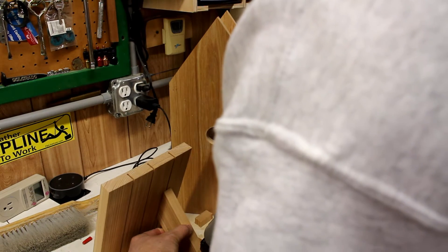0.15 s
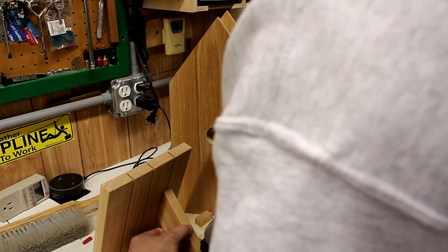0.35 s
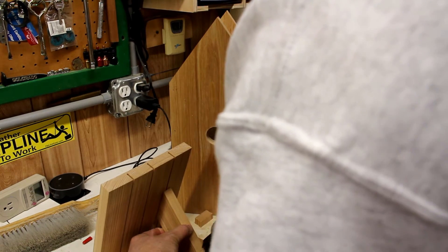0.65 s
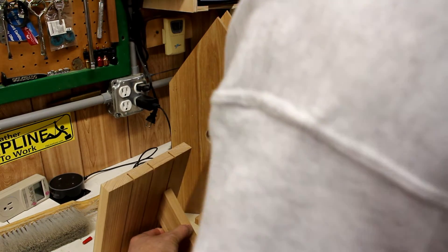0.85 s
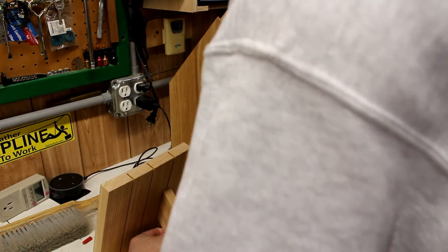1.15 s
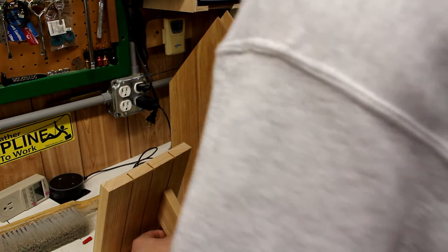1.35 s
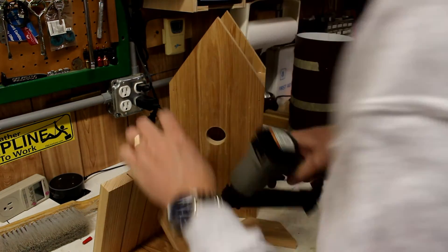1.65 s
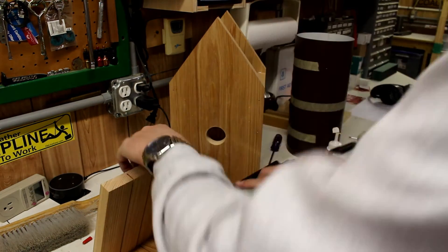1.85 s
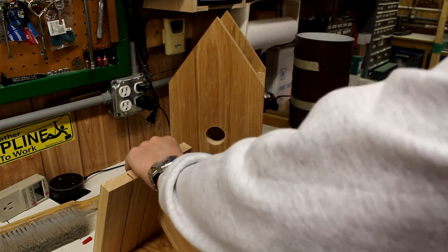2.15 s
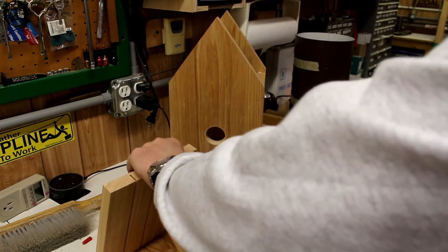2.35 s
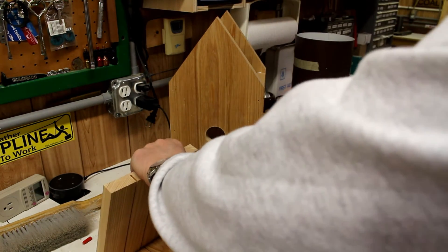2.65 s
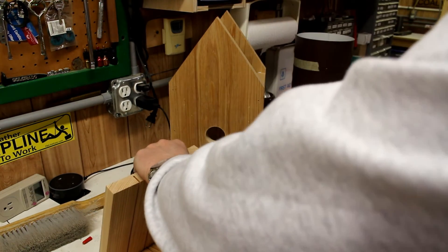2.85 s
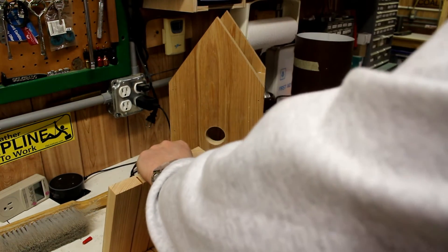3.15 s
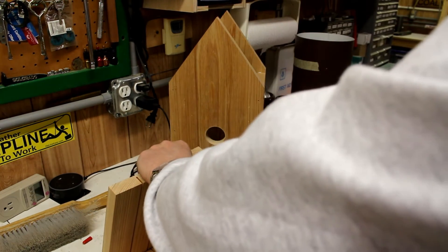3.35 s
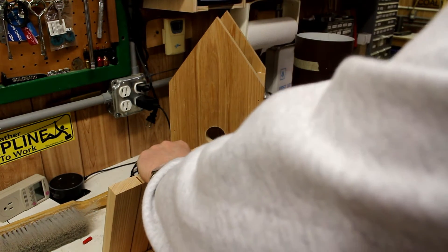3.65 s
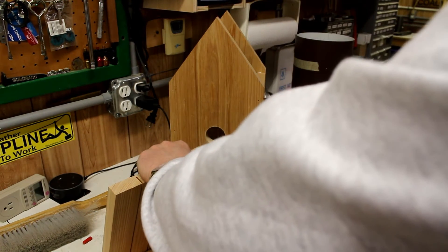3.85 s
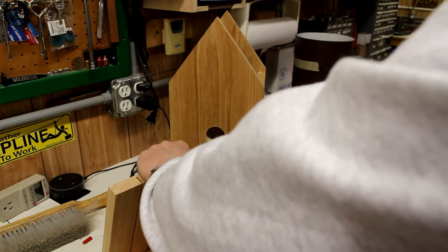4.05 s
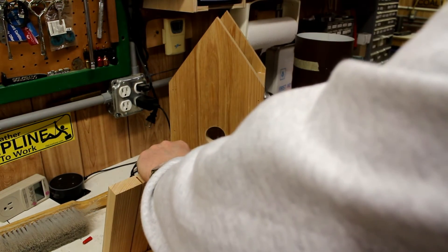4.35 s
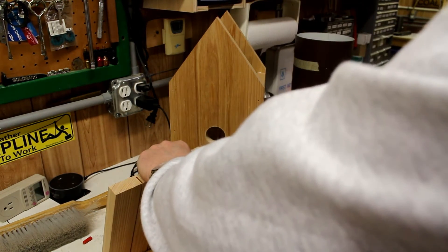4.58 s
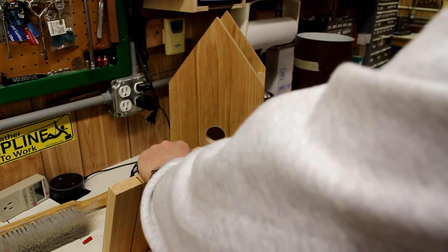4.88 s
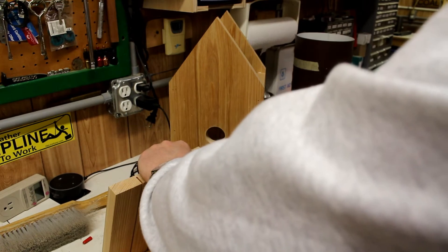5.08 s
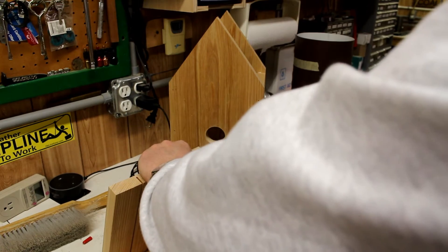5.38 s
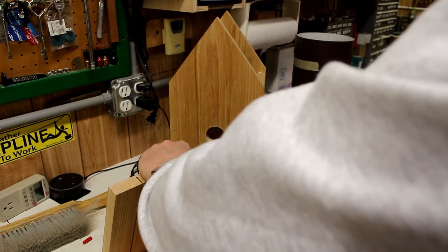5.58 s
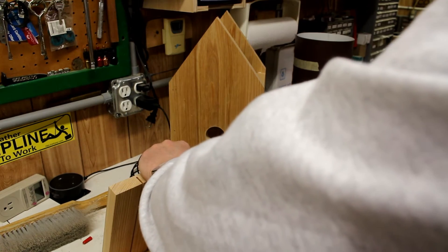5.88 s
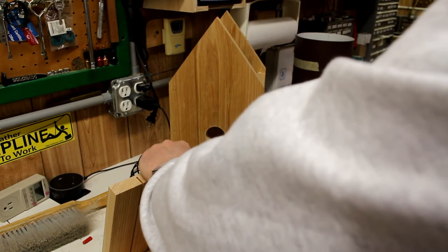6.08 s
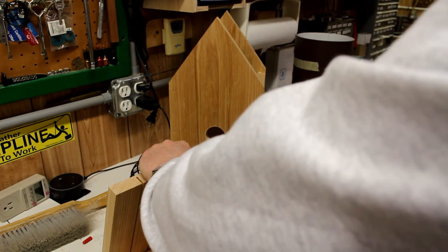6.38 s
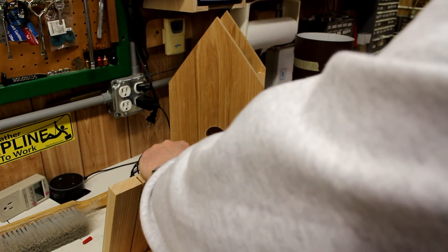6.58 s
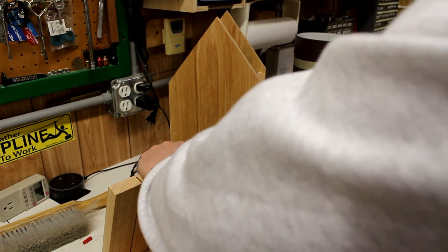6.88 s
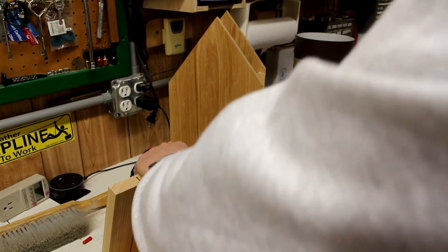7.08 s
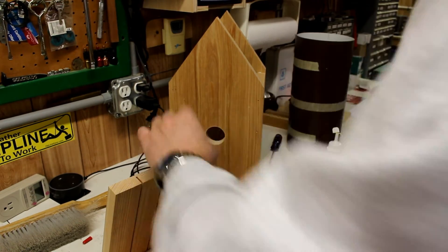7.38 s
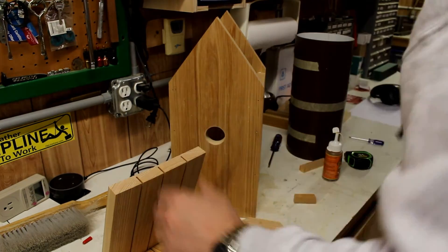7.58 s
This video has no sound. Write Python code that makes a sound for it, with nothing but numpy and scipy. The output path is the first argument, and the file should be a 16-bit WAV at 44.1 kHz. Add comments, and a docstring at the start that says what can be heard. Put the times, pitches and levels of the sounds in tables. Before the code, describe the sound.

Close stereo microphones in a small workshop. A faint board tap, then an air nailer slams with a hard crack, a rebound knock and a short burst of vented air. Steel clicks follow, then quiet handling: a bench thump, brief scrapes, hollow wood knocks and sleeve rustle. Metal clicks and squeaks gather before a second bang and puff, then a clink and soft nudges over low hum.

```python
"""Air nailer at the workbench

An air nailer drives two brads into a wooden birdhouse in a small workshop: bursts of noise and a pressure pulse.
Between and around the shots, boards tap, tick, knock and scrape (short noises and ringing tones, rubbing noise);
the nailer rebounds after each shot with a knock, and its sprung steel nose clicks (high ringing tones).
The bench thumps at low pitches and sleeves swish. Room tone and a low hum lie under it all.
A limiter ducks each shot and lets the room swell back."""
import sys
import numpy as np
from scipy import signal
from scipy.fft import rfft, irfft, next_fast_len
from scipy.io import wavfile
from scipy.ndimage import uniform_filter1d

SR = 44100
rng = np.random.default_rng(int(sys.argv[2]) if len(sys.argv) > 2 else 0)


def master_out(mix):
    """Clip the mix to full scale and print it as 16-bit PCM to the path in sys.argv[1]."""
    frames = np.transpose(np.atleast_2d(mix))
    ceiling = np.clip(frames, -1, 1)
    pcm = np.round(ceiling * 32767).astype(np.int16)
    wavfile.write(sys.argv[1], SR, pcm)


N = 340893
TIME = np.arange(N) / SR
HIT = np.arange(SR * 3 // 5) / SR  # the time axis of one blow

# In all tables t60 is the time to die away by 60 dB. Event levels are relative: some layers are trimmed later.
# One row a shot: (valve opens [s], valve level [dB], housing ring [dB], driver lands [s], driver level [dB],
# noise tail up to the exhaust [dB], exhaust starts [s], puff level [dB], puff t60 [s],
# trailing air [dB], its t60 [s])
SHOTS = [(.492, 11, -8.5, .5117, 17, -10, .6175, 4.5, 0.14, -11.5, 0.3),
         (6.6379, 7.5, -2, 6.6575, 15.5, -13, 6.753, 1.5, 0.13, -7, 0.34)]
# Colour of the air spitting through the valve: (frequency [Hz], level [dB])
VALVE_COLOUR = [(40, -9), (250, 1), (700, -11.5), (1500, -14), (2500, -3), (3550, -3), (4400, -6),
                (5350, 6), (6800, -11), (8800, 2), (11000, -9), (16000, -0.5)]
# Colour of the driver's slam: (frequency [Hz], level [dB])
DRIVER_COLOUR = [(40, -17), (170, -11), (400, -3.5), (850, -6.5), (1350, -2), (1700, 4), (2200, 1),
                 (3600, -2.5), (7000, -10.5), (16000, -16.5)]
# Ringing tones of the nailer's housing: (frequency [Hz], level [dB], t60 [s])
HOUSING_MODES = [(1200, -10.5, 0.075), (2430, -4.5, 0.0491), (3046, -11, .04), (3526, 1.5, 0.055),
                 (5400, -1.5, 0.043)]
# Colour of the steady noise tail between slam and exhaust, the room's ring: (frequency [Hz], level [dB])
TAIL_COLOUR = [(100, -3.5), (900, -3.5), (2000, 1), (5200, 1), (7000, -6), (10000, -10), (16000, -6.5)]
# Colour of the venting cylinder: (frequency [Hz], level [dB])
EXHAUST_COLOUR = [(40, -4.5), (300, -6), (1000, -10.5), (2000, -13.5), (3500, -3), (5800, 2), (8000, -3),
                  (11000, -6), (16000, -3)]

# The steel nose snaps, slides or catches:
# (time [s], click [dB], ring [dB], squeak [dB], wood under it [dB], contact t60 [s])
CLICKS = [(.766, -25, -33, -43, -37.5, 0.11), (1.621, -23, -17, -40, -62, 0.04),
          (1.634, -23.5, -27, -36, -67, 0.097), (3.553, -27, -25, -29, -49, 0.075),
          (3.722, -35, -39, -62, -54, 0.0083), (5.109, -35.5, -60, -53, -41.5, 0.022),
          (5.331, -26.5, -61, -33, -38, 0.017), (5.534, -27.5, -31, -17.5, -48, 0.067),
          (5.5809, -24, -45, -29, -45.5, 0.018), (5.831, -31, -43, -29, -39.5, 0.074),
          (5.974, -36.5, -55, -55, -43.5, 0.028), (6.155, -31.5, -59, -45, -52, 0.03),
          (6.248, -28.5, -51, -35, -33, 0.027), (6.386, -26.5, -45, -28.5, -43, 0.066),
          (6.409, -33.5, -54, -46, -43.5, 0.018), (6.4772, -25, -43, -37, -30, 0.021),
          (6.927, -16, -24, -38, -37.5, 0.036), (6.935, -21, -56, -41, -50, 0.016),
          (7.313, -30, -28, -45, -70, 0.18)]
# Ringing tones of the steel nose: (frequency [Hz], level [dB], t60 [s])
STEEL_MODES = [(2640, -13, 0.056), (3200, -13.5, .025), (6153, -1, 0.025), (6250, -2.5, 0.053),
               (8160, -19, .045), (9160, -13, 0.063), (9600, -18, 0.095), (12200, -10, 0.035),
               (15590, -12, 0.033)]
# Highest tones, heard as the steel slides: (frequency [Hz], level [dB], t60 [s])
SQUEAK_MODES = [(10000, -17.5, 0.049), (14000, -4, .024), (14300, -8, 0.016), (15650, -7, .02)]
# Ringing tones of the nailer's spring: (frequency [Hz], level [dB], t60 [s])
SPRING_MODES = [(1630, -0.5, 0.049), (2280, -4, .09), (5260, 2, 0.03), (6660, 1, .05), (8350, -1.5, 0.054)]
NOSE_WOOD_HZ = 440  # pitch of the board where the nose touches it
RESEAT_S, RESEAT_DB = 6.934, -21  # the nailer rocks back against the wood and its housing rings
RELEASE_S, RELEASE_DB = 7.3138, -30.5  # the nailer is lifted off and its spring clinks
SKID_RAD = 0.38  # how far the chattering contact jolts each tone's phase

# Knocks on wood: boards tapping, and the nailer rebounding after each shot:
# (time [s], clack [dB], board ring [dB], bright edge [dB], clack t60 [s])
KNOCKS = [(0.08, -38, -46.5, -35.5, 0.033), (0.3653, -24, -34, -27.5, 0.034),
          (0.6443, -18, -33, -10, 0.037), (0.6665, -14, -34, -28, 0.027), (2.1288, -28, -24, -58, 0.048),
          (2.6343, -31.5, -36, -67, 0.026), (2.915, -33, -35.5, -58, 0.08), (2.9377, -36, -41, -37.5, .04),
          (2.9663, -24.5, -42.5, -48, 0.02), (3.0211, -31, -44, -52, 0.013),
          (3.1453, -24.5, -39, -50, 0.013), (3.1959, -29, -36.5, -48, 0.026),
          (3.2278, -28.5, -47, -55, .04), (3.3974, -37, -42.5, -37.5, 0.033),
          (3.4498, -21, -31.5, -43, 0.025), (3.8693, -35.5, -47, -62, 0.032), (4.899, -25, -30, -30, 0.04),
          (4.9783, -24.5, -47, -51, 0.032), (6.78, -4, -21, -7, 0.03), (6.802, -3, -27, -20, .04)]
# Ringing tones of the boards: (frequency [Hz], level [dB], t60 [s])
BOARD_MODES = [(184, -5.5, .12), (251, -1, 0.083), (345, -0.5, 0.081), (400.7, -2, 0.13), (478, -2, 0.082),
               (590, -2.5, 0.085), (720, -4, 0.05), (870, -8, 0.074)]
# Colour of the dry clack: (frequency [Hz], level [dB])
CLACK_COLOUR = [(200, -14), (700, -10), (1100, -3), (1800, 2), (2400, -3), (3100, 1), (5000, -7.5),
                (7500, -17), (16000, -39)]
# Colour of the knock's bright edge: (frequency [Hz], level [dB])
EDGE_COLOUR = [(1000, -33.5), (4500, -9), (7800, 5.5), (10500, -4), (13000, -1.5), (16000, -2.5)]
# An edge catches in the grain and lets go with a dry tick: (time [s], level [dB], pitch [Hz])
TICKS = [(2.987, -40, 4800), (3.0884, -38, 3800), (3.438, -34.5, 4070), (4.05, -51.5, 2800),
         (4.119, -51.5, 4150), (4.574, -47.5, 1490), (4.646, -50.5, 2120), (4.888, -42, 2470),
         (5.444, -39.5, 2580), (6.123, -43, 2760), (6.157, -33.5, 2980), (6.411, -31.5, 2890)]
TICK_T60_S, TICK_RING_S = 0.06, 0.097  # t60 of a tick's snap and of its ring
# A board is nudged against its neighbour and gives a hollow knock: (time [s], level [dB], pitch [Hz])
NUDGES = [(2.918, -34.5, 391), (3.131, -36.5, 387), (3.564, -36, 428), (3.608, -37.5, 380),
          (3.869, -44, 470), (3.959, -46.5, 400), (4.208, -41, 397), (4.978, -29.5, 412),
          (7.628, -40.5, 440), (7.65, -40.5, 426)]
BEND, BEND_S = 0.18, 0.015  # pressed wood starts sharp by this fraction; time constant of its relaxing

# The bench takes a push: (time [s], level [dB], pitch [Hz], builds in [s])
THUMPS = [(2.13, -16.5, 178.2, 0.004), (2.134, -23.5, 86.5, 0.0097), (2.636, -31, 190, 0.0042),
          (3.19, -34.5, 125, 0.011), (3.462, -35.5, 125, 0.01), (3.722, -28, 83.4, 0.02),
          (3.876, -33, 77.6, 0.011), (4.897, -33.5, 188, 0.0029), (5.121, -20, 113.8, 0.022),
          (5.433, -32, 61, 0.014), (5.861, -28.5, 55, 0.015), (6.93, -35.5, 114, .009),
          (7.19, -38, 40, 0.016), (7.645, -34, 32.3, .03)]
# The sway's t60 at this pitch; lower sways last longer by this power
SWAY_T60_S, SWAY_HZ, SWAY_SLOPE = 0.21, 100, 0.84
# A board slides over the bench:
# (start [s], level [dB], breaks loose in [s], pushed for [s], t60 as it comes to rest [s])
SCRAPES = [(2.284, -35.5, 0.0035, 0.012, 0.12), (2.304, -36.5, 0.0089, .008, 0.71),
           (2.834, -43, 0.062, 0.033, 0.098), (2.935, -42, .007, 0.062, 0.67),
           (3.074, -40, 0.016, 0.053, 0.08), (3.189, -35.5, 0.0033, .008, 0.065)]
# Colour of rubbing wood grain: (frequency [Hz], level [dB])
GRAIN_COLOUR = [(120, -26), (220, 1.5), (461, -2), (815, -6), (1100, -2), (2400, -4.5), (3000, -4),
                (3250, -10), (3520, -2), (4150, -12), (4730, -9), (5100, -16), (5700, -16), (8210, -25.5),
                (14000, -42)]
# Colour of boards shifting under the hands: (frequency [Hz], level [dB])
JOSTLE_COLOUR = [(30, -3.5), (110, 7.5), (170, -8), (240, -5), (330, -12), (460, -7), (800, -17.5),
                 (2000, -38.5), (6000, -50)]
HOLD_S, HOLD_FOR_S, HOLD_DB = 1.51, 5.48, -52.5  # hands hold the boards: start, duration, steady jostle
# The boards rock after each contact: level relative to its wood level in the tables, rise and t60
ROCK_DB, ROCK_RISE_S, ROCK_T60_S = -14, 0.0294, 0.61
# The sleeve brushes past as the arm moves: (middle [s], length [s], level [dB])
SWISHES = [(1.695, 0.43, -48), (2.164, 0.31, -48.5), (4.899, 0.051, -41.5), (5.57, 0.44, -52.5),
           (6.45, 0.14, -45.5), (7.23, 0.67, -52), (7.71, 0.17, -45)]
# Colour of the brushing sleeve: (frequency [Hz], level [dB])
CLOTH_COLOUR = [(300, 8.5), (900, 5.5), (2500, 4.5), (4000, 0), (5000, 3), (6500, -6.5), (9000, -5),
                (12000, -17), (16000, -16.5)]
# Colour of the sleeve on the long reach: (frequency [Hz], level [dB])
REACH_COLOUR = [(1000, -7), (4200, -4), (5000, 2), (7000, -5), (9500, -8.5), (16000, -22)]
REACH_S, REACH_FOR_S, REACH_DB = 1.916, 0.36, -52.5  # an arm reaches across the bench: start, duration, level

# Colour of the room tone: (frequency [Hz], level [dB])
AIR_COLOUR = [(25, -27.5), (50, -18), (85, -15), (125, -21), (220, -26), (730, -29.5), (1050, -31),
              (2000, -35), (2700, -37), (5000, -39.5), (10000, -48.5)]
AIR_DB = -54.5
# Mains hum: (frequency [Hz], level [dB])
HUM = [(60, -51), (120, -65)]
# How long the room rings: (frequency [Hz], t60 [s])
ROOM_DECAY = [(100, 0.4), (500, 0.6), (2000, 0.53), (5000, 0.57), (9000, 0.35), (16000, 0.19)]
# Left-right difference relative to the middle: (frequency [Hz], level [dB])
WIDTH = [(40, -30), (250, -21), (600, -16.5), (1200, -25), (2500, -23), (5000, -19), (14000, -16)]
# Colour of each microphone's own noise: (frequency [Hz], level [dB])
HISS_COLOUR = [(100, 1.5), (1000, 0.5), (16000, 0.5)]
HISS_DB = -55.5
BAND_END_HZ = 16050


def amp(db):
    """Decibels to gain."""
    return 10 ** (np.asarray(db) / 20)


def unit(x):
    """Scales to rms 1."""
    return x / np.sqrt(np.mean(x ** 2) + 1e-20)


def crest(x):
    """Scales so that the loudest 4 milliseconds have rms 1."""
    return x / np.sqrt(uniform_filter1d(x ** 2, size=176).max() + 1e-20)


def read(points, hz):
    """Reads a table at any frequency, on a logarithmic frequency axis."""
    f, value = np.transpose(points)
    return np.interp(np.log(hz + 1), np.log(f + 1), value)


def add(mix, s, sound):
    """Lays a sound into the mix at time s."""
    part = mix[round(s * SR):][:len(sound)]
    part += sound[:len(part)]


def noise(spectrum, size=N, ripple_db=0):
    """Noise of rms 1 with the given colour, and optional chance peaks a few hundred Hz apart."""
    count = next_fast_len(size)
    hz = np.fft.rfftfreq(count, 1 / SR)
    ripple = np.interp(hz, np.linspace(0, SR / 2, 80), rng.standard_normal(80))
    colour = amp(read(spectrum, hz) + ripple_db * ripple)
    return unit(irfft(rfft(rng.standard_normal(count)) * colour, count)[:size])


def drift(rate):
    """A random wander of rms 1, heading for a new value rate times a second."""
    return unit(np.interp(TIME * rate, np.arange(N // 8), rng.standard_normal(N // 8)))


def swell(rise, t60):
    """A smooth, quick rise and an exponential fall."""
    attack = np.sin(np.pi / 2 * np.minimum(HIT / rise, 1)) ** 2
    return attack * amp(-60 * np.maximum(HIT - rise, 0) / t60)


def gesture(start, rise, hold, t60):
    """The gain of one movement: it builds, holds and dies away."""
    t = TIME - start
    return np.clip(t / rise, 0, 1) * amp(-60 * np.maximum(t - rise - hold, 0) / t60)


def burst(spectrum, rise, t60):
    """A puff of noise that rises quickly and dies away."""
    return crest(noise(spectrum, len(HIT)) * swell(rise, t60))


def knock(spectrum, rise, t60):
    """Noise standing for a crowd of heavily damped tones; each contact favours different ones."""
    return crest(noise(spectrum, len(HIT), ripple_db=3) * swell(rise, t60))


def ring(modes, contact_t60):
    """Tones driven by a chattering contact: each builds and skids, then dies at its own speed."""
    out = np.zeros(len(HIT))
    for hz, db, t60 in modes:
        shape = swell(contact_t60 / 10, t60)
        jolts = SKID_RAD * np.interp(HIT * hz / 12, np.arange(1000), rng.standard_normal(1000))
        skid = jolts * swell(0.001, 6 * contact_t60)
        turns = (hz + 14 * rng.standard_normal()) * HIT + rng.random()  # the grip shifts each tone
        level = amp(db + 1.7 * rng.standard_normal())
        out += level * shape * np.sin(2 * np.pi * turns + skid)
    chatter = 1 + 0.61 * rng.standard_normal(len(HIT)) * swell(0.001, contact_t60)
    return crest(out * uniform_filter1d(chatter, size=16))


def relaxing(hz):
    """A tone that starts a little sharp and sinks to its pitch."""
    return np.sin(2 * np.pi * np.cumsum(hz * (1 + BEND * np.exp(-HIT / BEND_S))) / SR)


def hollow(hz):
    """A board's main bending tone speaks first; a lower one blooms after it, over the ring of the rest."""
    upper = relaxing(hz) * swell(0.0059, 0.048)
    lower = amp(-12) * relaxing(hz * 0.554) * swell(0.019, 0.1)
    return crest(crest(upper + lower) + amp(-2) * ring(BOARD_MODES, contact_t60=0.09))


def grains(per_s, spread_db, colour, t60):
    """Scattered micro-contacts of uneven size, each one of eight kinds of tiny noisy click."""
    sizes = amp(spread_db * np.minimum(rng.exponential(1, N), 3))
    train = (rng.random(N) < per_s / SR) * sizes
    kind = rng.integers(0, 8, N)
    out = np.zeros(N)
    for k in range(8):
        click = burst(colour, rise=0.00023, t60=t60)[:SR // 20]
        out += signal.oaconvolve(train * (kind == k), click)[:N]
    return unit(out)


def shots():
    """The valve spits, the driver slams, a noise tail rings on; letting the trigger go vents the cylinder."""
    out = np.zeros(N)
    for (valve_s, valve_db, housing_db, driver_s, driver_db, tail_db,
         vent_s, puff_db, puff_t60, trail_db, trail_t60) in SHOTS:
        # air rushes in while the piston travels, and stops soon after it lands
        stroke = np.clip(1 - (HIT - driver_s + valve_s) / 0.0101, 0, 1)
        spit = burst(VALVE_COLOUR, rise=0.004, t60=0.029)
        inrush = amp(-12.0) * stroke * burst(VALVE_COLOUR, rise=0.024, t60=0.19)
        add(out, valve_s, amp(valve_db) * (spit + inrush))
        add(out, valve_s, amp(housing_db) * ring(HOUSING_MODES, contact_t60=0.05))
        add(out, driver_s, amp(driver_db) * burst(DRIVER_COLOUR, rise=0.0027, t60=0.033))
        u = HIT / 0.00045
        add(out, driver_s, -amp(driver_db + 4.0) * u * (2 - u) * np.exp(-u))  # the recoil's pressure pulse
        fade = np.clip(1 - (HIT - vent_s + driver_s) / 0.02, 0, 1)  # the tail fades out around the exhaust
        add(out, driver_s, amp(tail_db) * fade * burst(TAIL_COLOUR, rise=0.013, t60=0.65))
        flutter = amp(1.5 * drift(rate=200)[:len(HIT)])  # the escaping jet is turbulent
        puff = amp(puff_db) * burst(EXHAUST_COLOUR, rise=0.004, t60=puff_t60)
        trail = amp(trail_db) * burst(EXHAUST_COLOUR, rise=0.021, t60=trail_t60)
        add(out, vent_s, flutter * (puff + trail))
    return out


def nose():
    """Steel clicks and rings against the wood; where it slides, its highest tones squeak."""
    out = np.zeros(N)
    colour = [(100, 0.0), (450, -14), (900, -3.5), (1600, -5.0), (3000, 1.5), (4500, -2.0),
              (7800, 1.0), (10500, -3), (13000, -2.5), (16000, -0.5)]  # (frequency [Hz], level [dB])
    for s, click_db, ring_db, squeak_db, wood_db, t60 in CLICKS:
        add(out, s, amp(click_db) * knock(colour, rise=0.0022, t60=t60))
        add(out, s, amp(ring_db) * ring(STEEL_MODES, contact_t60=0.0089))
        add(out, s, amp(squeak_db) * ring(SQUEAK_MODES, contact_t60=t60))
        add(out, s, amp(wood_db) * hollow(NOSE_WOOD_HZ))
    add(out, RESEAT_S, amp(RESEAT_DB) * ring(HOUSING_MODES, contact_t60=0.023))
    add(out, RELEASE_S, amp(RELEASE_DB) * ring(SPRING_MODES, contact_t60=0.029))
    return out


def wood_knocks():
    """Each board tap or nailer rebound has a bright edge, a dry clack and the hollow ring of the boards."""
    out = np.zeros(N)
    for s, clack_db, board_db, edge_db, t60 in KNOCKS:
        seating = 1 + amp(-12.0) * drift(rate=320)[:len(HIT)]  # the faces meet unevenly
        clack = crest(seating * knock(CLACK_COLOUR, rise=0.0012, t60=t60))
        add(out, s, amp(clack_db - 7.0) * clack)
        add(out, s, amp(board_db + 1.5) * ring(BOARD_MODES, contact_t60=0.015))
        add(out, s, amp(edge_db - 1) * knock(EDGE_COLOUR, rise=0.002, t60=0.015))
    return out


def ticks():
    """A small catch in the grain snaps free and rings briefly around one pitch."""
    out = np.zeros(N)
    for s, db, hz in TICKS:
        colour = [(hz / 8, -20), (hz * 0.75, -12), (hz, 0), (hz * 1.25, -11), (hz * 2.2, -20), (hz * 4, -42)]
        snap = burst(colour, rise=0.0028, t60=TICK_T60_S)
        tone = np.sin(2 * np.pi * hz * HIT) * swell(0.00092, TICK_RING_S)
        add(out, s, amp(db) * (amp(-1.5) * snap + amp(-12) * tone))
    return out


def nudges():
    """The boards knock softly against each other, each with a hollow ring."""
    out = np.zeros(N)
    for s, db, hz in NUDGES:
        add(out, s, amp(db) * hollow(hz))
    return out


def thumps():
    """The bench sways at one low, sinking pitch, blurred by its neighbours; the lower, the longer."""
    out = np.zeros(N)
    for s, db, hz, rise in THUMPS:
        colour = [(hz / 4, -14), (hz, 0), (hz * 2, -8), (hz * 4, -24), (hz * 20, -65)]
        neighbours = noise(colour, len(HIT))
        shape = swell(rise, SWAY_T60_S * (SWAY_HZ / hz) ** SWAY_SLOPE)
        add(out, s, amp(db) * (relaxing(hz) + 0.46 * neighbours) * shape)
    return out


def scrapes():
    """Wood grain catches and slips unevenly under a sliding board."""
    rub = unit(noise(GRAIN_COLOUR) * amp(2 * drift(rate=260)))
    grit = [(400, -11.5), (1500, 1.0), (3500, 6), (4200, -12),
            (5200, 5.0), (6200, -20), (9000, -20), (14000, -36)]  # (frequency [Hz], level [dB])
    catches = grains(per_s=170, spread_db=5, colour=grit, t60=0.008)
    speed = sum(amp(db) * gesture(s, rise, pushed, t60) for s, db, rise, pushed, t60 in SCRAPES)
    return speed * (amp(-2) * rub + amp(-7.5) * catches)


def jostle():
    """The boards shift under the hands, and rock for a moment after every knock and click."""
    contacts = [(s, db) for s, _, db, _, _ in KNOCKS]
    contacts += [(s, db) for s, _, _, _, db, _ in CLICKS]
    power = (amp(HOLD_DB) * gesture(HOLD_S, rise=0.1, hold=HOLD_FOR_S, t60=2.1)) ** 2
    for s, wood_db in contacts:
        add(power, s, (amp(wood_db + ROCK_DB) * swell(ROCK_RISE_S, ROCK_T60_S)) ** 2)
    return np.sqrt(power) * unit(noise(JOSTLE_COLOUR) * amp(4.5 * drift(rate=42)))


def cloth():
    """Each swish of the sleeve swells and fades evenly; the long reach has a hiss of its own."""
    speed = sum(amp(db) * np.exp(-(2 * (TIME - s) / length) ** 2) for s, length, db in SWISHES)
    reach = amp(REACH_DB) * gesture(REACH_S, rise=0.035, hold=REACH_FOR_S, t60=1.16)
    return amp(-1.5) * speed * noise(CLOTH_COLOUR) + reach * noise(REACH_COLOUR)


def background():
    """Even room tone and a steady mains hum whose phase wanders slightly."""
    hum = np.zeros(N)
    for hz, db in HUM:
        hum += amp(db) * np.sqrt(2) * np.sin(2 * np.pi * hz * TIME + 0.1 * drift(rate=4))
    return amp(AIR_DB) * noise(AIR_COLOUR) + hum


def workshop(x, wet_db, early_db):
    """Quick echoes off bench and wall, then a diffuse tail that dies at its own speed in each band."""
    t = np.arange(SR) / SR
    hz, frame_s, z = signal.stft(rng.standard_normal(SR), SR, nperseg=256)
    z *= amp(-60 * frame_s / read(ROOM_DECAY, hz)[:, None])
    tail = signal.istft(z, SR, nperseg=256)[1][:SR] * np.clip((t - 0.004) / 0.00674, 0, 1)
    sparse = rng.standard_normal(SR) * (rng.random(SR) < 1500 / SR)  # about 1500 echoes a second
    early = sparse * (t > 0.0015) * np.exp(-t / 0.014)
    echo = amp(wet_db) * tail / np.linalg.norm(tail) + amp(early_db) * early / np.linalg.norm(early)
    return x + signal.fftconvolve(x, echo)[:N]


def microphones(x):
    """Two close ports hear nearly the same; they differ in scattered echoes and in their own hiss."""
    count = next_fast_len(N + len(HIT))
    scatter = rng.standard_normal(len(HIT)) * HIT * np.exp(-HIT / 0.003)
    scatter /= np.linalg.norm(scatter)
    colour = amp(read(WIDTH, np.fft.rfftfreq(count, 1 / SR)))
    side = irfft(rfft(x, count) * rfft(scatter, count) * colour, count)[:N]
    hiss = np.array([noise(HISS_COLOUR), noise(HISS_COLOUR)])
    return np.array([x + side, x - side]) + amp(HISS_DB) * hiss


def scene():
    """The nailer and the handwork in the room, over the background."""
    nailer = workshop(shots(), wet_db=-22, early_db=-13)
    steel = workshop(nose(), wet_db=-14.5, early_db=-9.0)
    wood = workshop(wood_knocks() + ticks() + nudges(), wet_db=-14.5, early_db=-7.0)
    handling = workshop(thumps() + scrapes() + jostle() + cloth(), wet_db=-13.0, early_db=-10.5)
    return microphones(nailer + steel + wood + handling + background())


def record(dry):
    """A limiter drops almost at once and recovers steadily; peaks clip, and the band ends steeply."""
    power_db = 10 * np.log10(abs(uniform_filter1d((dry ** 2).mean(0), size=130)) + 1e-12)
    recovery_db = 70 * TIME  # the gain recovers by 70 dB a second
    held_db = np.maximum.accumulate(power_db + recovery_db) - recovery_db
    over_db = np.maximum(held_db + 5.0, 0)  # the limiter acts above -5 dB
    limited = np.clip(dry / amp(uniform_filter1d(over_db, size=40)), -1, 1)
    lowpass = signal.firwin(511, BAND_END_HZ, window=("kaiser", 8), fs=SR)
    return signal.oaconvolve(limited, lowpass[None], "same")


dry = scene()
out = record(dry)
master_out(out)
```